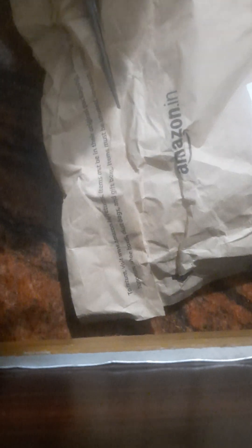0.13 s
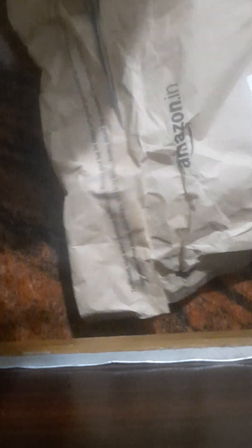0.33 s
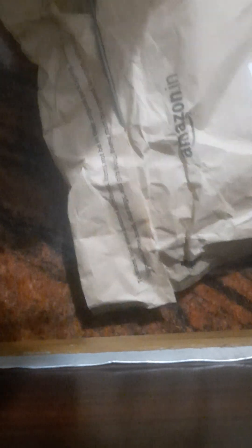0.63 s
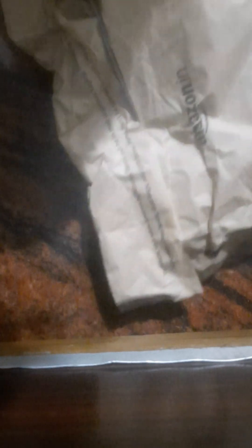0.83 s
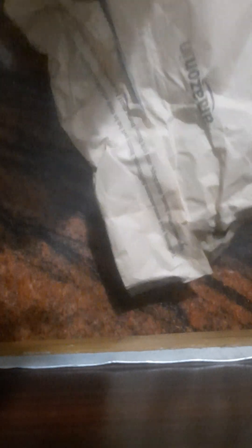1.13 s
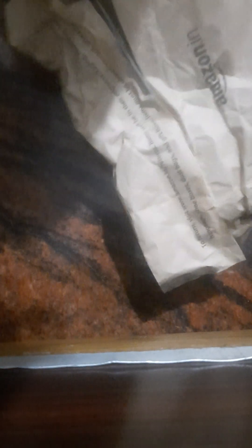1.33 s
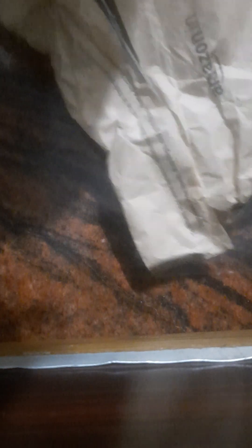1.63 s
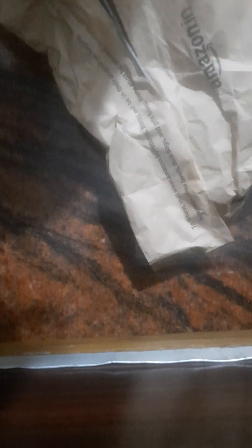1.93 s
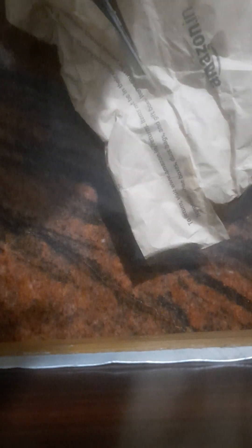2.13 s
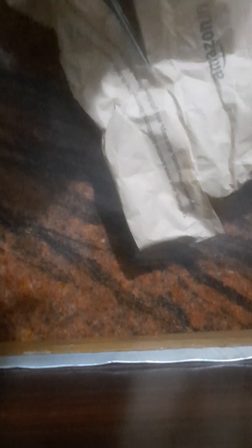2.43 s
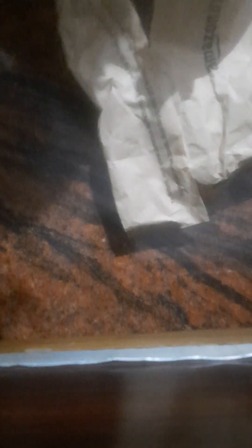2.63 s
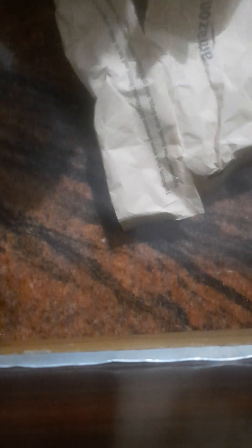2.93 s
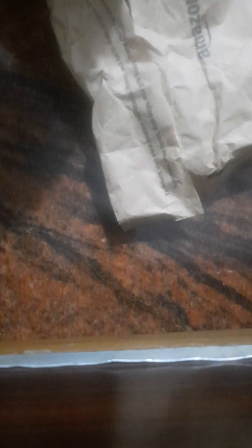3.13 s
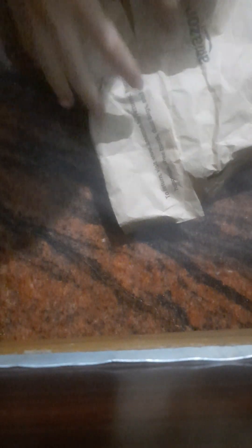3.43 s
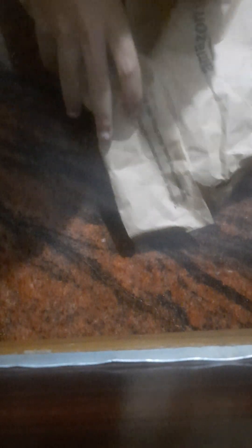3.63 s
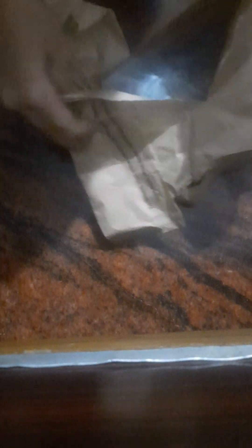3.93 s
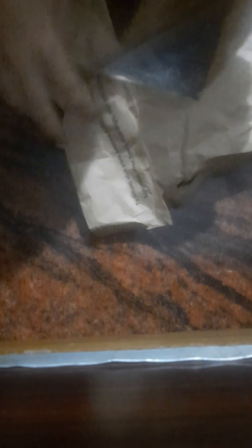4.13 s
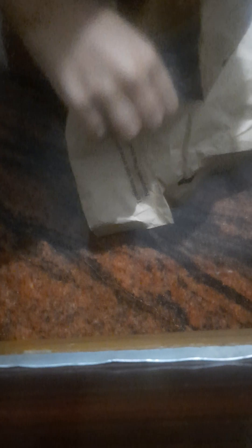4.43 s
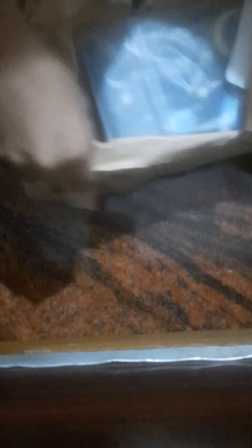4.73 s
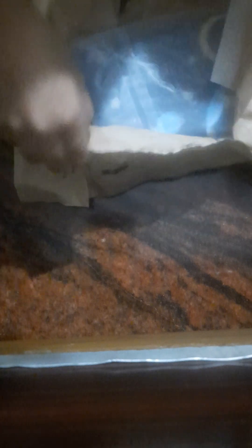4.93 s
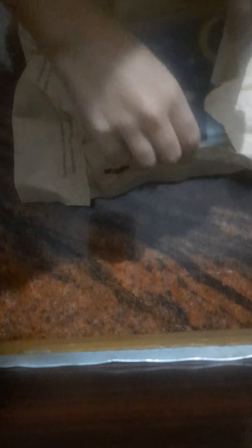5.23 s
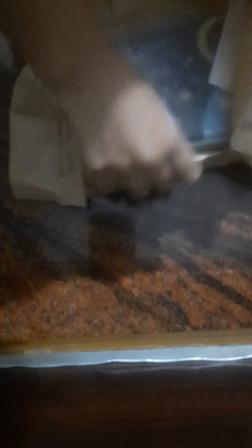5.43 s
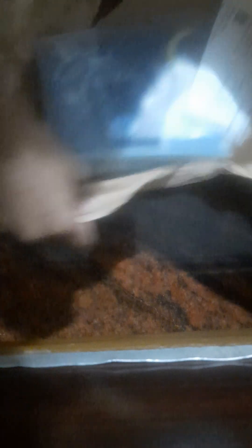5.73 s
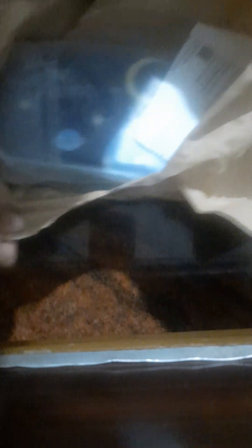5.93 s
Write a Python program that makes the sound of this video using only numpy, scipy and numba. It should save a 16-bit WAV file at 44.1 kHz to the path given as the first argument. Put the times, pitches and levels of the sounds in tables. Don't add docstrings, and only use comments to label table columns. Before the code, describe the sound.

Dry papery rips and crease snaps come in uneven strokes on a stone counter, pausing briefly before hands rustle the bag open.

```python
import sys
import numpy as np
from scipy import signal
from scipy.fft import rfft, irfft
from scipy.io import wavfile
from scipy.ndimage import uniform_filter1d, map_coordinates
from numba import njit

SR = 44100
rng = np.random.default_rng(int(sys.argv[2]) if len(sys.argv) > 2 else 0)


def linear_from_db(decibels):
    return 10 ** (np.asarray(decibels, float) / 20)


def dump(signal):
    limited = np.clip(np.atleast_2d(signal).T, -1, 1)
    pcm = np.round(limited * 32767).astype(np.int16)
    wavfile.write(sys.argv[1], SR, pcm)


N = 268128

# lowest f/Hz, highest f/Hz, ring length/cycles, trim level/dB
PATCHES = [
    (152.3, 365, 8.8, 1),
    (380, 3070, 7.8, 0),
    (3080, 7780, 8, 3.5),
    (7500, 14900, 54, 4),
]
# rise/(dB/s), in the order of PATCHES
GRIP_DB_PER_S = (450, 1100, 1500, 1500)
# fall/(dB/s), in the order of PATCHES
LET_GO_DB_PER_S = (300, 510, 515, 560)
# t/s, length/s, crease level/dB, brightness/dB, weight/dB
CUTS = [(0, 0.054, -25, -14, -14), (.17, 0.12, -28, -7.5, -9.5), (.26, 0.07, -29.5, -7, -22),
        (.375, 0.076, -22, -9, -11.5), (.47, 0.05, -49, -1.5, -21), (.575, .03, -29, -7, -11),
        (.61, 0.068, -28, -3, -15), (.69, 0.079, -55, 1, 12), (.775, 0.069, -35.5, -5, -4.5),
        (.82, 0.096, -22.5, -7.5, -14.5), (.94, 0.12, -52.5, -2, -15), (1.035, 0.12, -26.5, -5, -8.5),
        (1.19, 0.24, -43.5, -2, -5), (1.32, .12, -22.5, -7.5, -29), (1.45, 0.025, -40, 7, 2),
        (1.6, 0.099, -33, -6.5, -9), (1.73, 0.047, -38.5, -6.5, 1), (1.83, 0.098, -57.5, -5, 5),
        (1.965, .19, -30.5, -8.5, -9.5), (2.17, .1, -39.5, -6.5, -16), (2.28, 0.085, -54.5, -4, 2),
        (2.39, 0.26, -37.5, 0.5, 1.5), (2.65, 0.059, -43, 4, -4), (2.74, 0.42, -59, -9.5, 1)]
# t/s, length/s, crease level/dB, brightness/dB, weight/dB
PULLS = [(2.969, 0.073, -55.5, 11, -5), (3.075, 0.094, -50.5, 7, -2), (3.397, 0.047, -22, -8, -23),
         (3.46, 0.086, -33.5, -7.5, -18), (3.623, 0.076, -28, 4, -7.5), (3.693, 0.18, -20.5, -1, -6),
         (3.92, .17, -47, -6, -24), (4.093, 0.055, -41.5, -6.5, -9), (4.425, 0.056, -45.5, -6, -21),
         (4.479, .08, -33, 6, -5), (4.556, 0.2, -24.5, 0.5, -3.5), (4.779, 0.028, -45.5, -15, -16),
         (4.849, 0.049, -33, -6.5, -5.5), (4.919, 0.11, -44, -7, -11), (5.05, 0.11, -53, -12, -9),
         (5.148, 0.031, -48.5, -10, -1), (5.201, 0.11, -55.5, 2, 3.5), (5.348, .14, -34, -10.5, -8),
         (5.506, 0.041, -22, 1.5, -2.5), (5.563, 0.044, -36.5, 3, 9), (5.633, 0.058, -54.5, 15.5, -4),
         (5.687, 0.06, -19.5, 1, -1.5), (5.776, 0.065, -34.5, -4, -5), (5.851, 0.2, -38, -9.5, -13)]
# t/s, peak level/dB, ring f/Hz, bright tilt/dB
CUT_SNAPS = [(.065, -15, 1910, -8.5), (.164, -24, 3500, 7), (.2172, -9.5, 1660, -1.5),
             (.2815, -10.5, 1900, -5), (.394, -10.5, 790, 3.5), (.4185, -9.5, 734, -1),
             (.4457, -7.5, 710, 9), (.5771, -27.5, 1500, -11), (.6094, -13, 1000, -9.5),
             (.7708, -6, 3550, 4.5), (.8178, -8.5, 1330, -3), (.8804, -14, 7500, 10.5),
             (1.0443, -32.5, 12170, 19), (1.232, -24.5, 900, -16.5), (1.2773, -22, 1430, -9),
             (1.3232, -9.5, 980, 0), (1.3686, -10.5, 1190, -10), (1.393, -12.5, 1960, 20),
             (1.4199, -11.5, 1240, 19), (1.6136, -13.5, 1050, -0.5), (1.963, -19.5, 1500, -6),
             (2.1401, -13.5, 1510, 12.5), (2.2198, -16.5, 2200, -6), (2.3925, -13, 4010, -6),
             (2.4275, -22, 800, -12), (2.4418, -10, 2520, 8.5), (2.471, -9.5, 3200, -11.5),
             (2.5057, -10, 3880, 0), (2.56, -14.5, 1580, -9.5), (2.6089, -7, 4900, -2)]
# t/s, peak level/dB, ring f/Hz, bright tilt/dB
PULL_SNAPS = [(2.9713, -23, 10300, 9), (2.9882, -13.5, 13000, 10), (3.024, -25.5, 12500, 14.5),
              (3.0772, -19, 13900, 17), (3.3901, -30, 2480, 9), (3.404, -11, 6800, 5),
              (3.4349, -11.5, 6200, 4), (3.491, -21, 3030, -4), (3.5007, -16.5, 1140, 1.5),
              (3.536, -10, 1160, 3.5), (3.5757, -6, 6560, -1.5), (3.623, -8.5, 2510, 10),
              (3.643, -7, 13520, -4), (3.6616, -2, 14040, -3), (3.7587, -14, 2900, -15),
              (4.1492, -20, 1646, 10.5), (4.4433, -26.5, 1780, -2), (4.473, -11, 2050, 4.5),
              (4.5662, -9, 7200, -8), (4.9724, -20, 3790, 2), (4.9842, -24, 2190, 3),
              (5.35, -27.5, 1480, 4), (5.4482, -14, 6870, 1), (5.4995, -9, 6450, -3),
              (5.588, -14.5, 8120, 10), (5.6845, -7, 10500, -2), (5.704, -10.5, 2320, 7),
              (5.787, -9.5, 6140, 4), (5.9957, -13.5, 2760, 3), (6.048, -22.5, 2660, 3)]
# t/s, peak level/dB, ring f/Hz
TICKS = [(.3264, -17, 860), (0.539, -27.5, 3380), (0.8505, -13, 1200), (1.033, -47, 7000),
         (1.1558, -16, 1660), (1.432, -13.5, 1800), (1.5852, -36, 4010), (1.6771, -22, 1820),
         (1.8189, -33, 9000), (1.8358, -22.5, 7400), (2.0202, -22.5, 1420), (2.1203, -16.5, 1530),
         (2.3555, -29.5, 2300), (2.5235, -8, 6530), (2.8668, -36, 6340), (2.892, -34.5, 3110),
         (3.137, -28, 3700), (3.1728, -31.5, 2340), (3.201, -34, 1080), (3.334, -51, 1450),
         (3.3684, -37.5, 3490), (4.0293, -36, 1290), (4.287, -48, 870), (4.413, -47, 1145),
         (4.9386, -30, 3660), (5.1107, -36.5, 6940), (5.1382, -37, 3340), (5.1651, -28.5, 1800),
         (5.3883, -23, 6950), (5.9216, -21.5, 3280)]
# t/s, level/dB
BUMPS = [(.02, -33.5), (.5, -42), (.63, -43), (.92, -41), (1.45, -38.5), (1.74, -47), (2.02, -42),
         (2.22, -52), (2.42, -36), (2.62, -41.5), (3.0, -58), (3.45, -46.5), (3.819, -44.5), (4.151, -55),
         (4.56, -45), (4.71, -38.5), (5.55, -55), (5.74, -38.5), (5.95, -48.5)]
# start t/s, end t/s, f/Hz, start level/dB, end level/dB
DRONE = [
    (1.6, 3.396, 207.2, -60.5, -62),
    (2.72, 2.956, 395, -47.5, -58),
    (4.204, 4.45, 208.4, -65, -73.5),
]
# f/Hz, level per Hz/dB
NEAR = [(30, -38.5), (55, -12.5), (72, -39), (100, -8.5), (145, -19), (250, -6.5), (340, -11), (410, -2),
        (1100, 7), (2200, -1.5), (5200, -7.5), (7200, -5.5), (8600, -13.5), (15000, -10)]
# f/Hz, level/dB
FAR = [(100, -3), (200, 2), (285, 8), (370, -11), (600, -4), (750, 4), (1030, -9), (1160, 0), (2090, -2),
       (2290, 7), (2500, -1), (7100, -7), (7900, -15), (15000, -18)]
# f/Hz, level per Hz/dB
HUSH = [(18, -11.5), (30, -7.5), (59, -9.5), (167, -30.5), (205, 25.5), (328, -12), (1370, -43),
        (3980, -41), (15000, -29.5)]


def level(x, db):
    return x * linear_from_db(db) / np.sqrt(np.mean(x ** 2))


def causal(x, log_gain):
    cep = irfft(log_gain)
    half = len(log_gain) - 1
    cep[1:half] *= 2
    cep[half + 1:] = 0
    response = np.atleast_1d(irfft(np.exp(rfft(cep))))
    return signal.fftconvolve(x, response[None], axes=1)[:, :x.shape[1]]


def colour(x, table):
    hz, db = np.transpose(table)
    grid = np.arange(2049) * SR / 4096
    gain_db = np.interp(np.log(grid + 1), np.log(hz), db)
    return causal(x, gain_db * np.log(10) / 20)


def strokes(start, length, db, rise, sag, fall):
    t = np.arange(0, N / SR + .002, .001)[:, None] - start
    before, held, after = np.minimum(t, 0), np.clip(t, 0, length), np.maximum(t - length, 0)
    each = db + rise * before - sag * held - fall * after
    total = 10 * np.log10(np.sum(linear_from_db(np.maximum(each, -150)) ** 2, axis=1))
    return np.interp(np.arange(N) / SR, np.arange(len(total)) / 1000, total)


def handling(sag_db_per_s=4.5, fibre_db=-3, fibre_per_bright=1.27):
    start, length, db, bright, weight = np.vstack([CUTS, PULLS]).T
    extra_db = [weight, 0, bright, fibre_db + fibre_per_bright * bright]
    return [strokes(start, length, db + extra, rise, sag_db_per_s, fall)
            for extra, rise, fall in zip(extra_db, GRIP_DB_PER_S, LET_GO_DB_PER_S)]


@njit
def ring(start, hz, cycles, size, phase):
    out = np.zeros((2, N + 200))
    for k in range(len(hz)):
        p = np.exp((2j * np.pi - 6.9 / cycles[k]) * hz[k] / SR)
        for c in range(2):
            z = size[c, k] * np.exp(1j * phase[k])
            for i in range(start[c, k], min(start[c, k] + int(cycles[k] * SR / hz[k]), N)):
                out[c, i] += z.imag
                z *= p
    return out[:, :N]


def arrivals(s, spot, lag=12.3, reach=12.3):
    return np.array([s * SR, s * SR + lag + reach * spot]).astype(np.int64)


def crinkle(count=5000, modes=4, spread_db=2.0, patch_db=0.5, most_db=37.0, smear_s=.005,
            patchy_db=4.0, swarm_db=2.0, hard_db=-22., soft_db=-40.):
    work_db = handling()
    when, big, spot = rng.random((count, 3)).T
    when = np.sort(when) * N / SR
    light = np.interp(work_db[1][(when * SR).astype(int)], [soft_db, hard_db], [1.5, .5])
    swarm = swarm_db * light * map_coordinates(rng.standard_normal(200), [when * 30], order=1)
    out = 0
    for (lo_hz, hi_hz, cycles, trim_db), db in zip(PATCHES, work_db):
        big_db = -light * (spread_db * np.log(big) + patch_db * np.log(rng.random(count)))
        size = linear_from_db(most_db * np.tanh(big_db / most_db))
        size = linear_from_db(swarm) * size / np.sqrt(uniform_filter1d(size ** 2, size=120))
        at, size = np.repeat(when, modes), np.repeat(size, modes)
        pick, late, turn, long = rng.random((count * modes, 4)).T
        hz = lo_hz + (hi_hz - lo_hz) * pick
        favoured = map_coordinates(rng.standard_normal((200, 6)), [at * 30, pick * 5], order=1)
        size = size * linear_from_db(patchy_db * favoured)
        size = size * np.sqrt(hz)
        start = arrivals(at + smear_s * late, np.repeat(spot, modes))
        sound = ring(start, hz, cycles * (0.56 + long), np.array([size, size]), 2 * np.pi * turn)
        out = out + level(colour(sound, NEAR), trim_db) * linear_from_db(db)
    return out


def room(x, scatter_db=(-6., -2.5), tail_db=(-9., -6.), alike_hz=1130.0,
         t60_s=0.18, treble_t60_s=0.32, scatter_s=0.0032):
    t = np.arange(2 ** 14) / SR
    one, two, three = rng.standard_normal((3, 2, len(t)))
    b, a = signal.butter(2, alike_hz, fs=SR)

    def unlike(v):
        return v + signal.filtfilt(b, a, v[:1] - v)

    bass = signal.lfilter(*signal.butter(1, 2500., fs=SR), two)
    tail = bass * 1000 ** (-t / t60_s) + 0.14 * three * 1000 ** (-t / treble_t60_s)
    tail = unlike(tail * np.clip(t / 0.0026, 0, 1))
    early = unlike(one * np.exp(-t / scatter_s) * np.clip(t / 0.0021, 0, 1))
    answer = 0
    for echo, db in ((early, scatter_db), (tail, tail_db)):
        energy = np.sum(echo ** 2, axis=1, keepdims=True)
        answer = answer + echo / np.sqrt(energy) * linear_from_db(np.array(db))[:, None]
    answer[:, 0] = 1
    broad = uniform_filter1d(np.abs(rfft(answer)) ** 2, size=17)[:, ::8]
    answer = np.vstack([causal(v[None], -np.log(g) / 2) for v, g in zip(answer, broad)])
    return signal.fftconvolve(x, answer, axes=1)[:, :N]


def hush():
    return level(colour(rng.standard_normal((2, N)), HUSH), -78.5)


def drag(trim_db=0.5, unlike=0.23, rise_db_per_s=135.5, fall_db_per_s=127.5):
    s, db = np.transpose(BUMPS)
    shared, left, right = rng.standard_normal((3, N))
    noise = shared + unlike * np.array([left, right])
    low = signal.sosfilt(signal.butter(4, 145., fs=SR, output="sos"), noise)
    bumps_db = strokes(s, 0, db, rise_db_per_s, 0, fall_db_per_s)
    return level(colour(low, NEAR), trim_db) * linear_from_db(bumps_db)


def snaps(modes=20, after=50, cycles=10.9, burst_s=.0022, main_db=2.0, crowd_db=-4.5, narrow_db=3.5,
          after_s=0.021, after_db=-3.0, low_cut_hz=300., body_db=-3.5, sizzle_db=-2.5, tick_tilt_db=-3.5):
    rows = CUT_SNAPS + PULL_SNAPS + [(*tick, tick_tilt_db) for tick in TICKS]
    s, peak_db, main_hz, tilt_db = np.transpose(rows)[:, :, None]
    pick, late, turn, long, spot = np.moveaxis(rng.random((len(rows), modes + after, 5)), 2, 0)
    part = np.arange(modes + after)
    hz = 350 * 45 ** ((part % modes + pick) / modes)
    hz[:, :1], late[:, 0] = main_hz, .1
    low = np.clip(np.log2(2500 / hz), 0, 1)
    high = np.clip(np.log2(hz / 7000) * 2, 0, 1)
    db = peak_db + low * (body_db - tilt_db) + high * (sizzle_db + tilt_db)
    db = db + np.where(part, crowd_db, main_db)
    db = db + np.where(part < modes, 0, after_db - 8 * late)
    wait = np.where(part < modes, burst_s * late ** 2, burst_s - after_s * np.log(1 - late))
    size = linear_from_db(db - narrow_db * np.abs(np.log2(hz / main_hz))).ravel()
    start = arrivals((s + wait).ravel(), np.repeat(spot[:, 0], modes + after))
    turns = cycles * (.5 + long) * np.sqrt(hz / 2000)
    sound = ring(start, hz.ravel(), turns.ravel(), np.array([size, size]), 2 * np.pi * turn.ravel())
    return signal.sosfilt(signal.butter(2, low_cut_hz, "high", fs=SR, output="sos"), sound)


def drone():
    t = np.arange(N) / SR
    out = 0
    for start, end, hz, from_db, to_db in DRONE:
        db = np.interp(t, [start - .05, start, end, end + 0.055], [-110, from_db, to_db, -110])
        out = out + linear_from_db(db) * np.sin(2 * np.pi * hz * t)
    return out


def scene():
    paper = room(crinkle() + linear_from_db(1.5) * snaps())
    near, far = paper + drag() + drone()
    return np.array([near, colour(far[None], FAR)[0]]) + hush()


def roll_off(x):
    return signal.sosfilt(signal.butter(12, 16990, fs=SR, output="sos"), x)


def record(dry):
    bass_cut = signal.butter(4, 45., "high", fs=SR, output="sos")
    top_cut = signal.ellip(6, .2, 24, 15980, fs=SR, output="sos")
    clipped = np.clip(signal.sosfilt(bass_cut, dry), -.97, .97)
    mix = signal.sosfilt(top_cut, clipped)
    return roll_off(mix)


dry = scene()
out = record(dry)
dump(out)
```